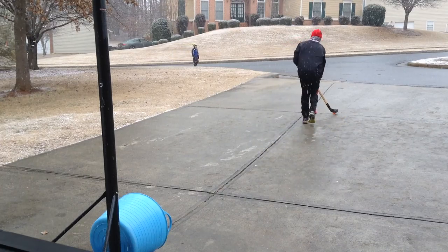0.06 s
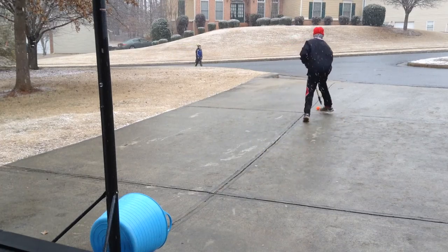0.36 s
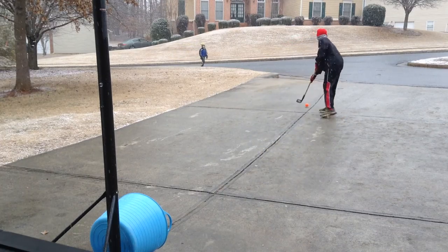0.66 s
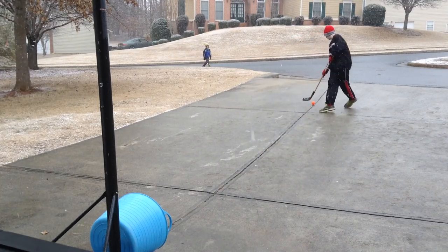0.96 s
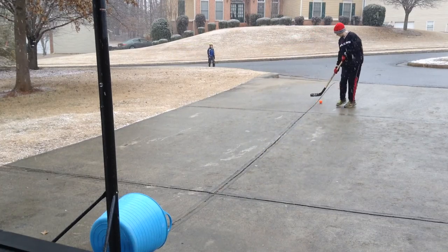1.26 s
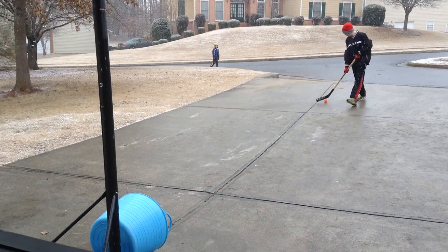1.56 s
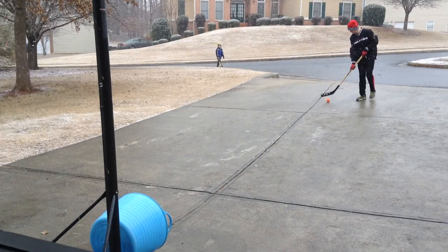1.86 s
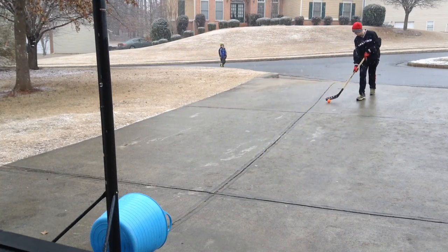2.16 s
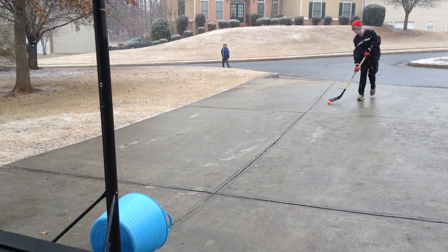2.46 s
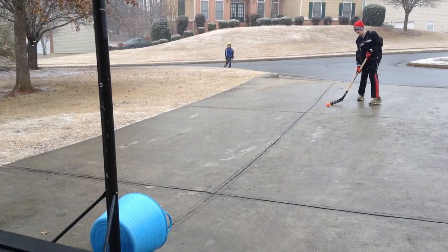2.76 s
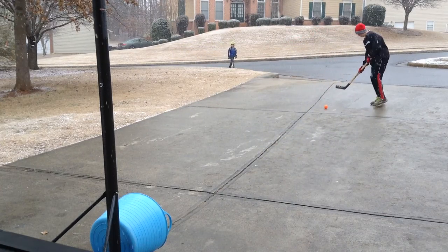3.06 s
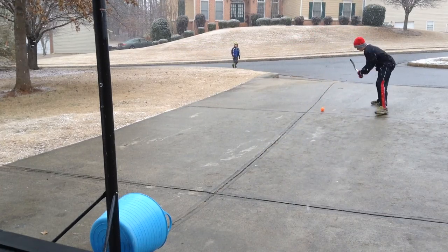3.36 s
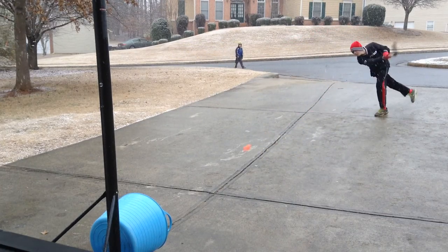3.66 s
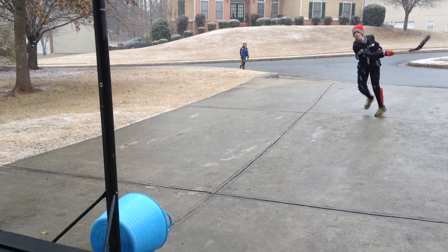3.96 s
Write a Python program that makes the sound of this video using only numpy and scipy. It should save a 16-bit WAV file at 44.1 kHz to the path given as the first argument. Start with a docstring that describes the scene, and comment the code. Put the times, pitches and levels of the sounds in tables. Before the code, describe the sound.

A hockey stick taps a plastic ball, then shoots it with a crack and a thud.

```python
"""Light taps of a hockey stick on a plastic ball, and scuffs on a concrete driveway, heard from an open garage.
Two hollow knocks lead into a swing: the blade cracks on ground and ball, and the ball bounces once,
then slams in close by with a thud and a rattle. The garage rings after every blow.
Outdoor air, a mains hum, a small bird and faint far whistles lie underneath."""
import sys
import numpy as np
from scipy import signal
from scipy.fft import rfft, irfft
from scipy.io import wavfile
from scipy.ndimage import uniform_filter1d

SR = 44100
rng = np.random.default_rng(int(sys.argv[2]) if len(sys.argv) > 2 else 0)


def bounce(signal):
    """Save signal as a 16-bit WAV file at the path given by the first command-line argument."""
    frames = np.transpose(np.atleast_2d(signal))
    limited = np.clip(frames, -1, 1)
    pcm = np.round(limited * 32767).astype(np.int16)
    wavfile.write(sys.argv[1], SR, pcm)


N = 176400
T = np.arange(N) / SR
AGE = T[:SR // 3]  # seconds since a hit


def amp(db):
    """Turn decibels into a gain."""
    return 10 ** (np.asarray(db) / 20)


def unit(x):
    """Scale a sound to an average (rms) level of 1."""
    return x / np.sqrt(np.mean(x ** 2))


def blow(x, db):
    """Give a short sound the energy of 5 ms at this level."""
    return x * amp(db) * np.sqrt(.005 * SR / np.sum(x ** 2))


def add(out, start_s, x):
    """Mix x into out at start_s."""
    i = int(start_s * SR)
    out[i:i + len(x)] += x[:max(len(out) - i, 0)]


def on_log(hz, points, values):
    """Read between the points of a curve, with octaves evenly spaced."""
    return np.interp(np.log(np.maximum(hz, 1)), np.log(points), values)


def colour(x, points, size=4096):
    """Shape the tone along (pitch_hz, gain_db) points."""
    hz, db = np.array(points, float).T
    gain = amp(on_log(np.arange(size // 2 + 1) * SR / size, hz, db))
    cepstrum = irfft(np.log(gain))
    # fold it so that the filter never sounds before the hit
    cepstrum[1:size // 2] *= 2
    cepstrum[size // 2 + 1:] = 0
    return signal.fftconvolve(x, irfft(np.exp(rfft(cepstrum))))[:len(x)]


def soften(x, hz):
    """Dull a sound above hz."""
    return signal.sosfilt(signal.butter(2, min(hz, .45 * SR), fs=SR, output="sos"), x)


def even(x, size=30):
    """Smooth out chance peaks and dips in the tone of a burst."""
    spectrum = rfft(x)
    return irfft(spectrum / np.sqrt(uniform_filter1d(np.abs(spectrum) ** 2, size)), len(x))


def wander(rate_hz, n):
    """A smooth random wobble, about 1 in size."""
    hold = int(SR / rate_hz)
    steps = np.repeat(rng.standard_normal(n // hold + 1), hold)
    return unit(uniform_filter1d(uniform_filter1d(steps, hold), hold))[:n]


def click(decay_s, grit=4.0):
    """A sharp contact followed by a short crunch."""
    spike = blow(1. * (AGE == 0), 0)
    crunch = blow(rng.standard_normal(len(AGE)) * np.exp(-AGE / decay_s), 0)
    return even(spike + grit * crunch) * np.exp(-AGE / (10 * decay_s))


def ring(tones, wave=np.sin):
    """A struck object rings with several tones, each fading by 60 dB in its ring_s."""
    return sum(amp(db) * wave(2 * np.pi * hz * AGE) * np.exp(-np.log(1000) * AGE / ring_s)
               for hz, db, ring_s in tones)


# tone of the outdoor air: pitch_hz, gain_db
AIR_TONE = [(40, -45), (80, -3), (140, -2), (220, 0.5), (400, -4.5), (620, -7.5), (950, -12.5), (1450, -11),
            (2200, -18), (6000, -18), (9000, -14), (12000, -17.5), (15000, -21)]


def outdoor_air(level_db=-60.5, waver_db=1.1):
    """A soft rush of air whose level wavers a little."""
    rush = unit(colour(rng.standard_normal(N), AIR_TONE))
    return rush * amp(level_db - waver_db * wander(5.4, N))


def mains_hum(pitch_hz=120, level_db=-63.5):
    """Mains power hums on one steady low note."""
    return amp(level_db) * np.sqrt(2) * np.sin(2 * np.pi * pitch_hz * T)


# far whistles: start_s, length_s, level_db, pitch_hz
WHISTLES = [(.42, 0.11, -69.5, 1330), (1.213, 0.073, -63.5, 1320), (1.351, 0.083, -67, 1396),
            (1.938, 0.12, -67, 1410)]


def far_whistles():
    """Faint, short notes with an unsteady pitch."""
    out = np.zeros(N)
    for start_s, length_s, db, pitch_hz in WHISTLES:
        n = int(length_s * SR)
        hz = pitch_hz * (1 + 0.043 * wander(300, n))
        add(out, start_s, amp(db) * signal.windows.tukey(n, .6) * np.sin(2 * np.pi * np.cumsum(hz) / SR))
    return out


# two bird chirps, each followed by its echo: start_s, length_s, level_db
CHIRPS_AND_ECHOES = [(.866, 0.029, -55), (0.897, 0.029, -55.5), (2.75, 0.023, -52), (2.778, 0.025, -56)]


def bird(from_hz=5700, to_hz=7530, rise_s=.008, roughness=0.029):
    """Each single chirp sweeps up, levels off and echoes off the garage wall about 30 ms later."""
    out = np.zeros(N)
    for start_s, length_s, db in CHIRPS_AND_ECHOES:
        t = T[:int(length_s * SR)]
        sweep_hz = to_hz + (from_hz - to_hz) * np.exp(-t / rise_s)
        hz = sweep_hz * (1 + roughness * wander(1100, len(t)))
        note = np.sin(2 * np.pi * np.cumsum(hz) / SR)
        add(out, start_s, amp(db) * signal.windows.tukey(len(t), .3) * note)
    return out


# how the garage rings, from bass to treble: pitch_hz, relative_db, ring_s
GARAGE_RING = [(102, -31, 0.38), (250, -1.5, 0.77), (597, 1.5, 0.75), (1500, -3.5, 0.93), (3270, -1.5, .85),
               (8400, 3.5, 0.5), (15100, 7, 0.31)]
# echoes off the walls: delay_s, gain_db, brightness_hz
WALL_ECHOES = [(.0075, -21.5, 8500), (0.011, -19.5, 9000), (0.0336, -10, 14000), (0.037, -8, 1300),
               (0.072, -17, 9000)]


def garage(tail_db=-3.5, build_s=0.034, early_db=-6.5, early_s=0.048):
    """The garage answers a click with early scatter, wall echoes and a tail whose treble dies first."""
    t = T[:SR]
    hz, db, ring_s = np.array(GARAGE_RING, float).T
    fade = np.exp(-t / .15)  # evens the tone mainly at the start, where the tail is loud
    scatter = even(rng.standard_normal(SR) * fade, size=120) / fade * (t < .8)
    spectrum, bins_hz = rfft(scatter), np.arange(SR // 2 + 1)
    bands = [irfft(spectrum * on_log(bins_hz, hz, share)) for share in np.eye(len(hz))]
    tail = sum(amp(db[k]) * band * np.exp(-np.log(1000) * t / ring_s[k]) for k, band in enumerate(bands))
    tail *= 1 - np.exp(-t / build_s)
    early = even(rng.standard_normal(SR) * np.exp(-t / early_s)) * np.exp(-t / (2 * early_s))
    out = amp(tail_db) * tail / np.linalg.norm(tail) + amp(early_db) * early / np.linalg.norm(early)
    for delay_s, gain_db, brightness_hz in WALL_ECHOES:
        add(out, delay_s, amp(gain_db) * soften(1. * (AGE == 0), brightness_hz))
    return out


def contact_tone(bass_db, bite_db, treble_db, top_db):
    """Tone of plastic or rubber on concrete; each gain is set against the middle pitches."""
    return [(70, bass_db - 4), (220, bass_db - 0.5), (650, bass_db), (980, bass_db / 2 - 3),
            (1300, 0.0051), (2400, 0), (3600, bite_db), (5500, (bite_db + treble_db) / 2 - 1),
            (8200, treble_db), (11500, top_db), (15000, top_db - 4)]


# scuffs on the driveway: start_s, rise_s, decay_s, level_db, bass_db, bite_db, treble_db, top_db
SCUFFS = [(0.722, 0.0031, 0.0065, -47, 13.5, -2, -3, -13), (1.035, 0.034, 0.034, -45.5, 4, 1.5, 1.5, -10),
          (1.53, 0.015, 0.043, -55, 6.5, -7.5, -5, -8), (2.041, 0.011, 0.026, -45, 4, -2.5, 2, -2),
          (3.092, 0.0093, 0.011, -42, 7, -12.5, -9.5, -15),
          (3.52, 0.074, 0.005, -44, 3.5, -4.5, -10.5, -13)]


def scuffs(grit_db=2):
    """Shoes and blade scrape the concrete in short, gritty swells."""
    out = np.zeros(N)
    for start_s, rise_s, decay_s, db, *tone in SCUFFS:
        grit = rng.standard_normal(len(AGE)) * amp(grit_db * wander(700, len(AGE)))
        swell = np.minimum(AGE / rise_s, 1) * np.exp(-np.maximum(AGE - rise_s, 0) / decay_s)
        add(out, start_s, amp(db) * swell * unit(colour(grit, contact_tone(*tone))))
    return out


# ringing tones of blade and ball: pitch_hz
BLADE_PITCHES = [285, 660, 815, 885, 1200, 1725, 1770, 2010, 2115, 2535, 2665, 3085, 3945, 4450]
# strength of each of those tones: relative_db
BLADE_LEVELS = [-7.5, -1, 1, 0, 4, 2, -2, 0.5, -0.5, 0.5, 1.5, -0.5, -7, -2.5]


def blade_ring(ring_at_1khz_s=0.053, damping=.3):
    """Blade and ball ring hollowly; higher tones die sooner."""
    hz = np.array(BLADE_PITCHES)
    ring_s = ring_at_1khz_s * (hz / 1000) ** -damping
    return ring(zip(hz, BLADE_LEVELS, ring_s), np.cos)


# taps on the ball: start_s, level_db, bass_db, bite_db, treble_db, top_db, decay_s
TAPS = [(0.1274, -36.5, -1.5, 0, 1.5, -9.5, 0.0031), (0.492, -52.5, 5, 3, -7, 5.5, 0.0024),
        (.504, -48, -1, -14, 7.5, 8.5, 0.00049), (.583, -47, 1, 10.5, 5, 2.5, 0.0033),
        (.747, -54, 2, 4, -19, -12, 0.00084), (0.8134, -44, 9.5, 1, 0, -6, 0.0048),
        (1.011, -50, -5, -9, -1, -16, 0.0017), (1.02, -47, -4, -2, -8, -8, 0.0023),
        (1.111, -42, 4, 3, 8, 5, 0.0016), (1.7247, -41.5, -11.5, -6.5, -22, -29, 0.003),
        (2.052, -50, 7.5, -11, -2, -1, 0.0011), (2.193, -52.5, -12, 6, 18, 13, 0.0037),
        (2.281, -53, -9, -1, 1, -24, 0.00086), (2.583, -49.5, -3, 2, -9, -8, 0.0024),
        (2.813, -54, 8, -16, -19, -18, 0.0016), (2.925, -46.5, -9, 16, 11, 3, 0.0058),
        (2.935, -48, -8, 27, 14, -3, 0.0013), (2.939, -40.5, -3, 11, 13, 0, .001)]


def taps(ring_db=-10.5):
    """The blade nudges the ball: a click with a little hollow ring."""
    out = np.zeros(N)
    for start_s, db, *tone, decay_s in TAPS:
        tap = blow(click(decay_s), 0) + blow(blade_ring(), ring_db)
        add(out, start_s, blow(colour(tap, contact_tone(*tone)), db))
    return out


# knocks before the shot: start_s, level_db, pitch_hz
KNOCKS = [(3.423, -51, 263), (3.4658, -34.5, 698)]


def knocks(ring_s=0.021, low_hz=234.5):
    """Dull, hollow knocks as the player steps into the swing."""
    out = np.zeros(N)
    for start_s, db, hz in KNOCKS:
        edge = colour(click(0.006), [(80, -24), (220, 6), (1800, -2), (3500, -13), (12000, -20)])
        body = ring([(hz, 0, ring_s), (low_hz, -18, 2 * ring_s)])
        add(out, start_s, blow(body, db) + blow(edge, db - 11))
    return out


# the ball landing: start_s, thud_db, click_db, rattle_db, rattle_delay_s, rattle_decay_s
LANDINGS = [(3.8644, -43, -29.5, -32.5, 0.0024, 0.02), (3.985, -4.5, -12, -9.5, .005, 0.021)]
# ringing tones of the thud: pitch_hz, relative_db, ring_s
THUD_TONES = [(271.5, 3, 0.21), (454, -5, 0.24), (559, 5, 0.16), (988, -2.5, 0.048), (1410, -6, 0.068),
              (1925, -8.5, 0.12), (2910, -13, 0.053)]
# tone of the rattle: pitch_hz, gain_db
RATTLE_TONE = [(200, -2), (1500, 1.5), (5000, -2.5), (7500, -7), (9500, -3), (15000, -7)]


def landings():
    """The ball bounces, then slams in close by: a thud with a bright rattle just behind it."""
    out = np.zeros(N)
    thud = soften(ring(THUD_TONES, np.cos), hz=2200)
    for start_s, thud_db, click_db, rattle_db, delay_s, decay_s in LANDINGS:
        edge = colour(click(0.0034), [(100, 6), (500, 22.5), (3000, 6.5), (6000, 11), (14000, -34)])
        add(out, start_s, blow(thud, thud_db) + blow(edge, click_db))
        flutter = rng.standard_normal(len(AGE)) * amp(1.1 * wander(900, len(AGE)))
        rattle = unit(colour(flutter, RATTLE_TONE)) * np.exp(-AGE / decay_s)
        add(out, start_s + delay_s, amp(rattle_db) * rattle)
    return out


# hits within the slap shot: start_s, level_db, brightness_hz
SHOT_HITS = [(3.6033, -16.5, 13810), (3.6049, -22, 4580), (3.6070, -16.5, 1500)]
# tone of the crack: pitch_hz, gain_db
CRACK_TONE = [(100, -24), (500, -5.5), (1500, 3), (3500, 6), (6000, -2), (8300, 1), (11000, -4.5),
              (15000, -9.5)]


def slap_shot(ring_start_s=3.6036, ring_db=-13.5):
    """The blade hits ground and ball within a few milliseconds, each hit duller, and rings briefly."""
    out = np.zeros(N)
    add(out, ring_start_s, blow(blade_ring(), ring_db))
    for start_s, db, brightness_hz in SHOT_HITS:
        crack = colour(click(decay_s=0.00068), CRACK_TONE)
        add(out, start_s, blow(soften(crack, brightness_hz), db))
    return out


def scene():
    """Short sounds arrive directly and again through the garage, over the air and hum."""
    # each pair: sound, gain_db on its way into the garage
    sources = [(taps() + scuffs(), -2), (knocks(), -5), (slap_shot(), 3.5), (landings(), -5),
               (bird() + far_whistles(), -2)]
    direct = sum(sound for sound, _ in sources)
    into_garage = sum(sound * amp(gain_db) for sound, gain_db in sources)
    echoes = signal.fftconvolve(into_garage, garage())[:N]
    return (direct + echoes + outdoor_air() + mains_hum())[None]


def record(dry, bass_cut_hz=105, top_cut_hz=15400, overload=1.1):
    """The microphone loses deep bass, rounds the loudest peaks and cuts the highest treble."""
    thin = signal.sosfilt(signal.butter(4, bass_cut_hz, "high", fs=SR, output="sos"), dry)
    rounded = np.tanh(overload * thin) / overload
    return signal.sosfilt(signal.ellip(10, .2, 80, top_cut_hz, fs=SR, output="sos"), rounded)


dry = scene()
out = record(dry)
bounce(out)
```